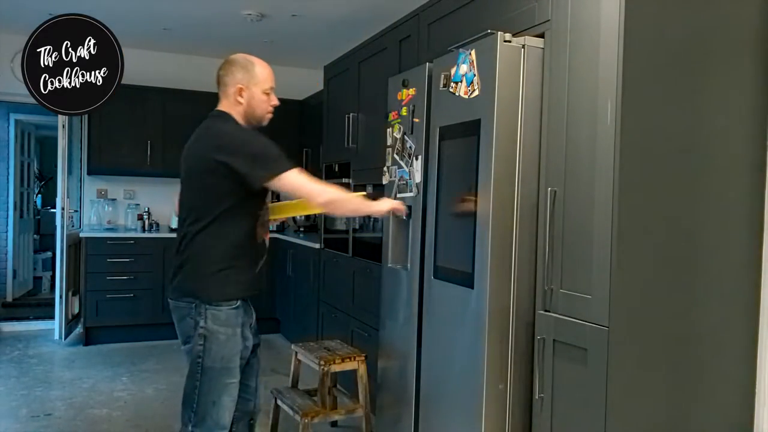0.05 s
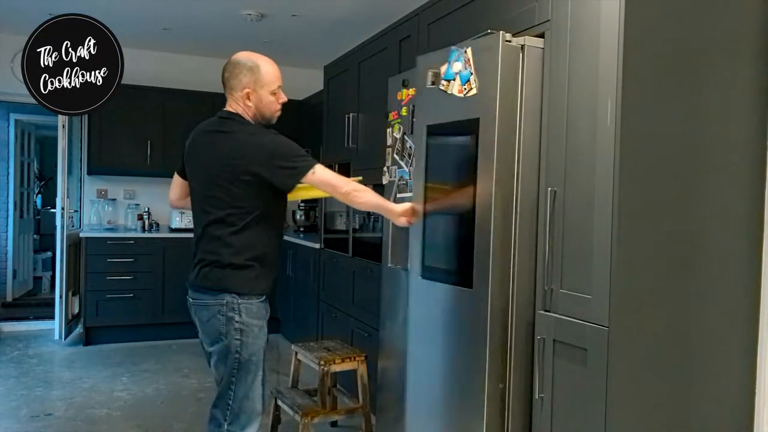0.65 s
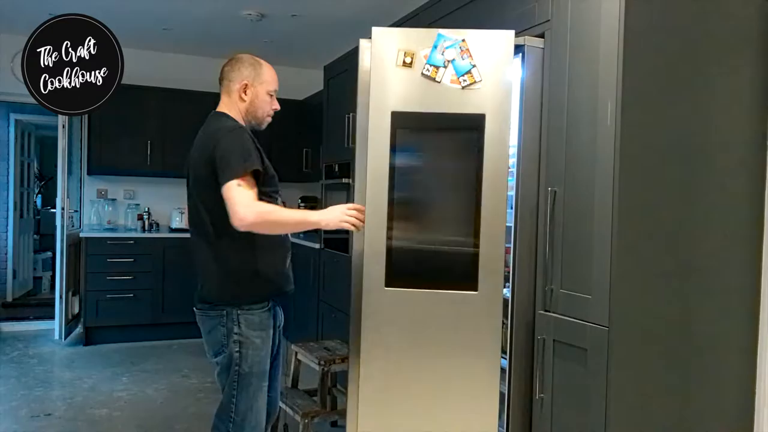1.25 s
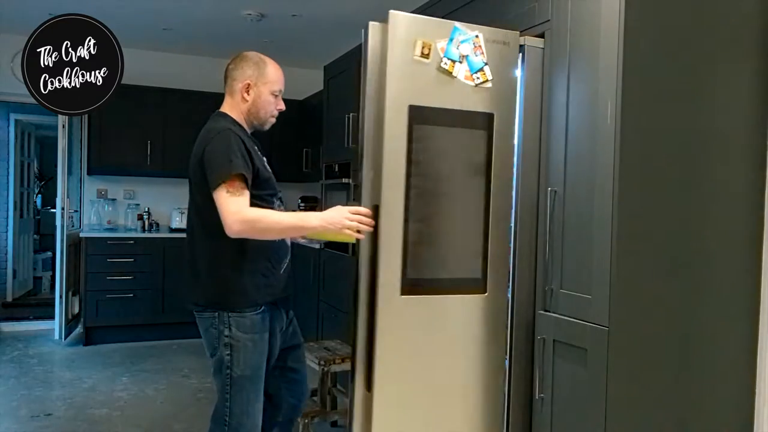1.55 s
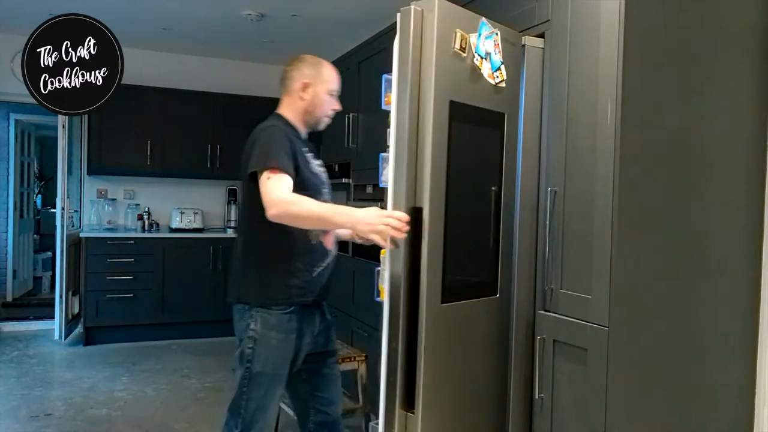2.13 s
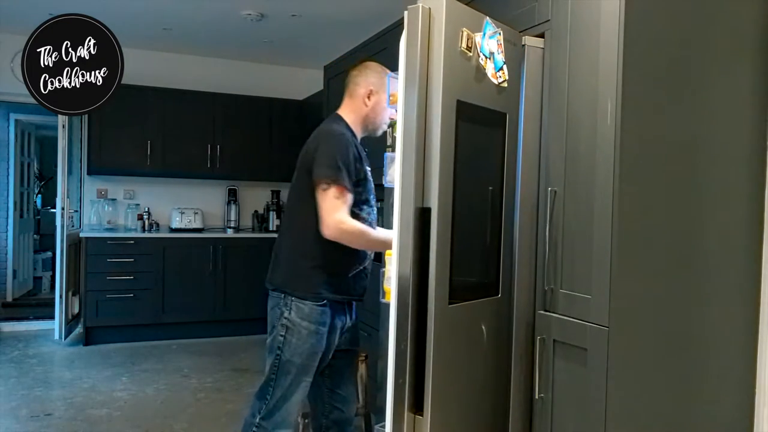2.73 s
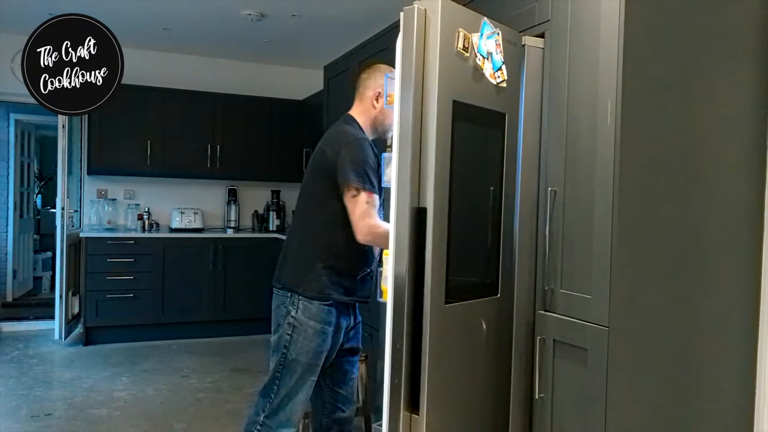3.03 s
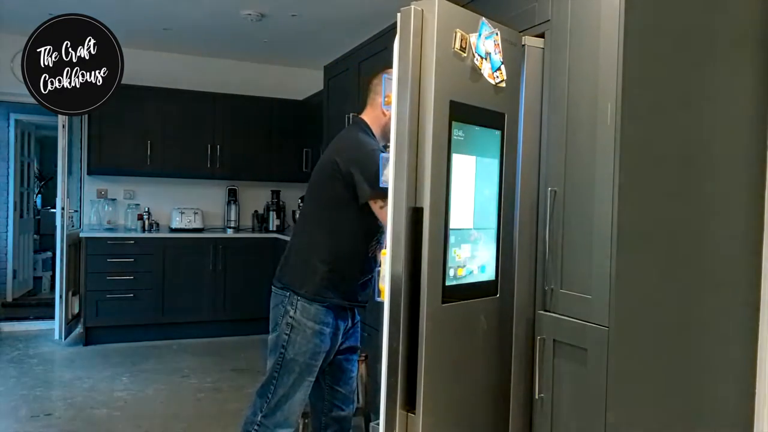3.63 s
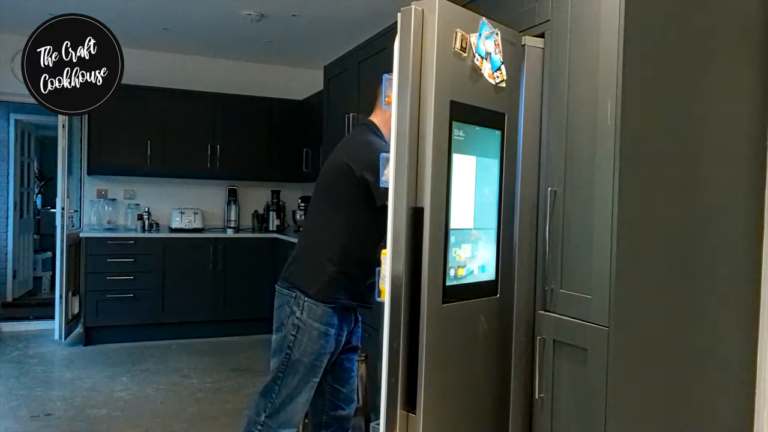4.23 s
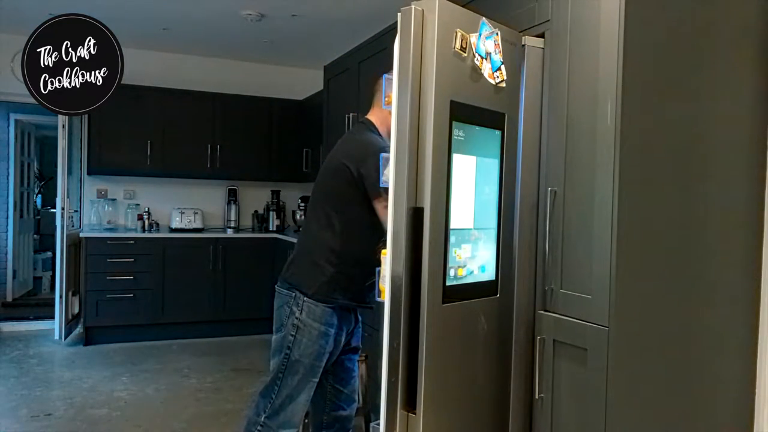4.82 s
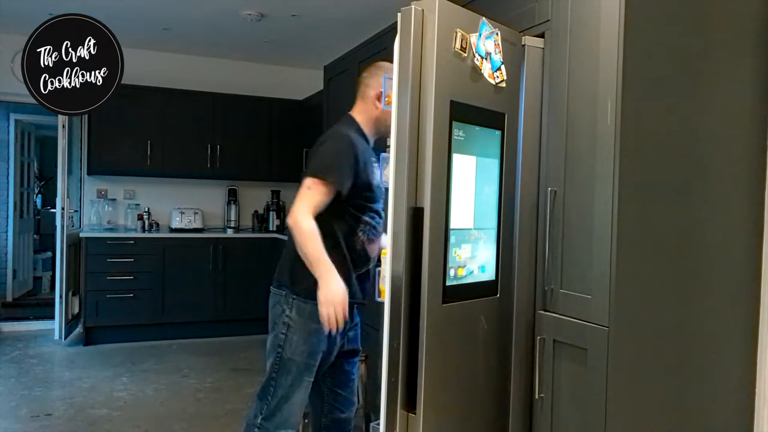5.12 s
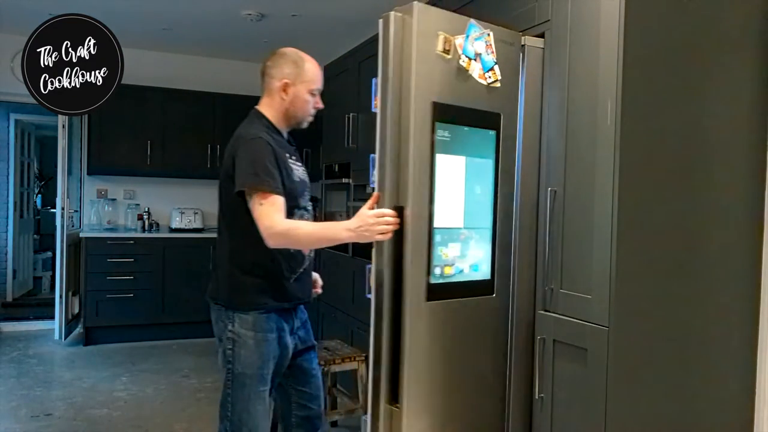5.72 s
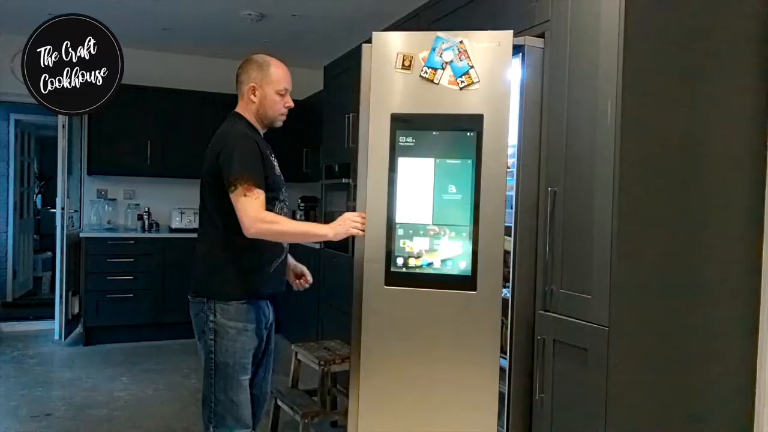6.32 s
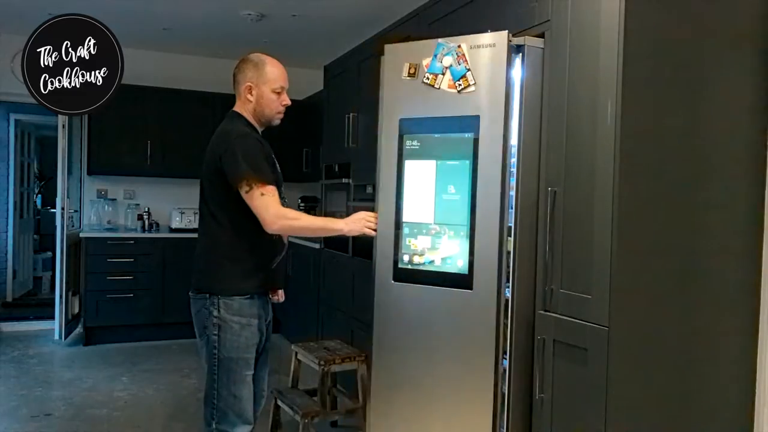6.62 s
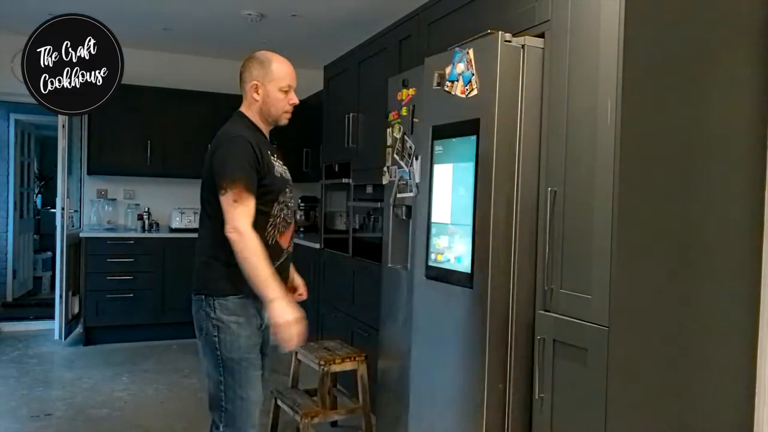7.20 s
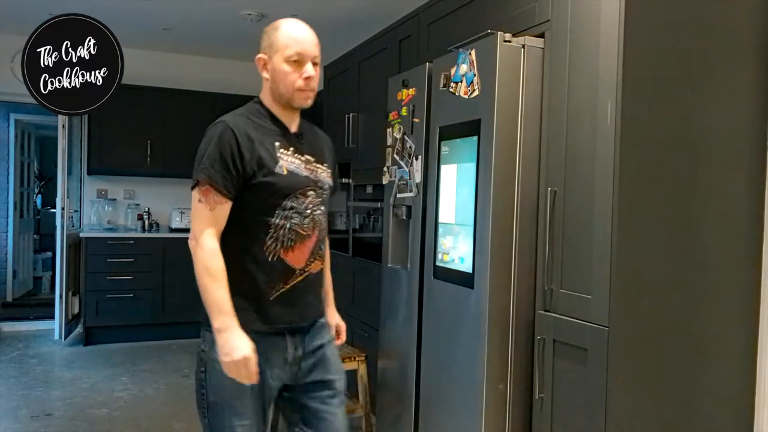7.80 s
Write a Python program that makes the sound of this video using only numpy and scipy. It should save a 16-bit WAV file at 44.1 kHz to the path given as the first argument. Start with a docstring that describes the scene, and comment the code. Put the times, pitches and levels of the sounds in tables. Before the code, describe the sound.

In a kitchen, someone opens a fridge, slides a dish in among clattering jars and tubs, and swings the door heavily shut.

```python
"""Fridge door and dishes

In a hard-floored kitchen, a rubber seal peels open and the hinge knocks and swishes as the door swings.
Jars, tubs and a dish are bumped, slid and set down; each knock sounds its own note and rings the shelves.
The door swings back with a faint squeak, pushes out a puff of air and shuts with a clack, a rattle
and a deep boom of the cabinet. Room air and the compressor's low hum run underneath."""
import sys
import numpy as np
from scipy import signal
from scipy.fft import rfft, irfft, next_fast_len
from scipy.io import wavfile
from scipy.ndimage import uniform_filter1d, map_coordinates

SR = 44100
rng = np.random.default_rng(int(sys.argv[2]) if len(sys.argv) > 2 else 0)


def waveform_to_disk(signal):
    """Save audio, clipped to [-1, 1], as 16-bit WAV at the path in sys.argv[1]."""
    frames = np.transpose(np.atleast_2d(signal))
    scaled = np.clip(frames, -1, 1) * 32767
    samples = np.round(scaled).astype(np.int16)
    wavfile.write(sys.argv[1], SR, samples)


N = 346302

# Levels in the tables are relative: the layers add their own trims.
BAND_EDGES = [45, 160, 450, 950, 1900, 4200, 16000]  # bounds of thump, knock, body, clack, snap and tick (frequency [Hz])
BAND_HZ = np.sqrt(np.multiply(BAND_EDGES[:-1], BAND_EDGES[1:]))
# tone of each kind of contact, a value per band (level [dB])
DOOR_BANDS = [-11.5, -4, -1, -6, -15, -19.5]
SHELF_BANDS = [-10.5, -2, -1, -4, -13, -11.5]
TICK_BANDS = [-18, -15.5, -16, -10, -13, -1]
SLAM_BANDS = [-2.5, -7.5, -3.5, -5, -19.5, -12.5]

# seal, hinge and handle (time [s], level [dB], hardness [dB/octave], room send [dB], pitch [Hz])
DOOR_KNOCKS = [(.31, -62, 5, 8, 1850), (.442, -44, -3, 8.5, 1400), (.51, -34.5, -3.5, 4, 1094),
               (.54, -44.5, 0.5, 10, 1440), (0.858, -50.5, -2, 9, 335), (1.072, -58.5, -6, -1, 296),
               (1.446, -67, 0, 13, 510), (1.754, -62.5, 7.5, 8.5, 640), (1.983, -59.5, -1.5, 8.5, 1510),
               (5.386, -49, 5, 0.5, 226), (5.495, -53.5, 3.5, 9.5, 1145), (5.961, -53, 0.5, 7.5, 338),
               (6.309, -54.5, 4.5, -0.5, 715), (6.61, -56.5, -11, 6, 320), (6.789, -63, -0.5, 10.5, 700)]
# the cabinet and its trapped air bounce (time [s], level [dB], pitch [Hz], t60 [s], rise [s])
BOOMS = [(0.534, -34.5, 59, 0.39, 0.0056), (5.374, -41, 61, 0.3, .005), (7.161, -43, 48.8, 0.33, 0.0079),
         (7.331, -15, 48.1, 0.3, 0.00018), (7.337, -30, 58, 0.54, 0.026)]
# jars, tubs and the dish hit the shelf (time [s], level [dB], hardness [dB/octave], room send [dB],
# pitch [Hz], note over knock [dB], note t60 [s])
SHELF_KNOCKS = [(2.132, -27, -2.5, -1, 232, 1, .33), (2.546, -29.5, 2, -4.5, 1200, 12.5, 0.03),
                (2.64, -32.5, -0.5, -1.5, 675, 1, 0.5), (2.733, -37, -3, 0.5, 71, -1, 0.64),
                (3.027, -47.5, 0, 2, 118, 13.5, 0.2), (3.157, -32, 3, -1.5, 734, -7, 0.68),
                (3.403, -34.5, 3, -7, 508, 21.5, 0.034), (3.646, -56, 2.5, -1.5, 783, 2, 0.3),
                (3.772, -39.5, 3.5, -0.5, 150, 0, 0.13), (3.792, -39, -14, 2.5, 240, 3, 0.11),
                (3.837, -32.5, -0.5, -9.5, 332, 6, 0.39), (3.902, -40, 1, 5.5, 100, -3.5, 0.17),
                (3.957, -43.5, 1, -6, 2040, 9, .045), (3.996, -26.5, 4.5, -7, 1360, 0.5, .06)]
TICKS = [(4.195, -44), (4.283, -47), (4.459, -47), (4.792, -54.5)]  # light plastic ticks (time [s], level [dB])
SQUEAK = [(6.04, 11600, -85), (6.15, 10800, -76), (6.26, 10400, -81), (6.37, 9400, -82)]  # the hinge sings, falling as the door slows (time [s], pitch [Hz], level [dB])

# envelopes (time [s], level [dB])
SEAL_PEEL = [(.33, -82), (.39, -63.5), (.44, -61), (.51, -57), (.6, -64), (.7, -70), (.85, -79)]
HINGE_SWINGS = [
    [(1.3, -95), (1.394, -71), (1.644, -65), (2.1, -72)],
    [(5.92, -92), (5.986, -67), (6.23, -81), (6.29, -88)],
    [(6.93, -97), (6.974, -85), (7.146, -74.5), (7.3, -75)],
]  # one per swing
SHELF_SLIDES = [
    [(2.755, -69), (2.789, -50), (2.815, -56.5), (2.865, -56), (2.95, -76)],
    [(3.45, -60.5), (3.58, -55.5), (3.59, -52.5), (3.648, -61), (3.74, -70)],
    [(3.925, -53), (3.963, -36), (3.99, -40)],
    [(4.025, -45), (4.041, -50.5), (4.125, -43), (4.173, -59), (4.18, -53)],
    [(4.22, -63), (4.234, -52.5), (4.41, -64), (4.464, -51.5), (4.58, -67)],
]  # one per slide
AIR_PUFF = [(7.1, -70), (7.17, -50.5), (7.22, -55.5), (7.29, -49), (7.325, -47), (7.335, -61)]

# noise colours (frequency [Hz], spectral level [dB])
ROOM_AIR = [(20, -0.5), (50, -3), (75, -4.5), (110, -9), (160, -9.5), (300, -13), (500, -18.5), (1000, -25),
            (2400, -32), (4500, -40.5), (8000, -40), (12500, -38.5), (16000, -33)]
RUBBER = [(100, 0), (300, 6), (800, 13.5), (1800, 5.5), (3500, -3), (7000, -5.5), (11000, -3.5),
          (16000, -7)]  # peeling seal
SWISH = [(2500, -30), (4500, -20), (6800, -9.5), (9800, -2), (11300, -5), (12300, -15), (16000, -11)]  # rubbing hinge
GLIDE = [(1000, -20), (3000, -15), (5000, -10), (8000, 1.5), (11000, 6), (13500, 4), (16000, -24)]  # light slide
SCRAPE = [(300, 6), (1000, 1.5), (2000, -7), (3000, -13.5), (5000, -8.5), (8000, -3.5), (12000, -4),
          (16000, -10)]  # hard slide
HOLLOW = [(40, -15), (75, 10), (140, -3), (235, -4), (335, 6.5), (450, -20), (650, 6.5), (1000, -12),
          (3000, -54)]  # cabinet under a slide
DRAUGHT = [(25, 4), (60, -8.5), (150, -5.5), (600, -9), (1500, -26), (4000, -45), (16000, -75)]  # air through the closing gap
RATTLE = [(1200, -22), (1900, -15.5), (2450, 9), (2900, 3), (3600, -21), (6000, -30), (16000, -40)]  # door racks

FRIDGE_MODES = [(108, -2, 0.6), (187.5, -20, 0.33), (235, 1.5, 0.49), (320, 4, 0.36), (431, 0, 0.15),
                (613, -1, 0.56), (674, -5.5, 0.65), (753, -0.5, 0.22), (1146, -7.5, 0.23),
                (1385, -5.5, 0.4), (1547, -11.5, 0.81), (1680, -4.5, 0.4), (1880, -9, 0.12),
                (2520, -13, 0.23), (3350, -7.5, 0.43), (5700, -11, 0.12), (6300, -33, 0.14)]  # cabinet with loaded shelves (frequency [Hz], level [dB], t60 [s])
KITCHEN_DECAY = [(60, 0.6), (250, 0.65), (700, 0.86), (2500, 0.81), (5500, 0.65), (11000, 0.44)]  # reverb time (frequency [Hz], t60 [s])
WALLS = [(50, -3.5), (200, -6), (600, -9), (1500, -11), (2600, -6.5), (5000, -13), (12000, -8.5)]  # colour of the reflections (frequency [Hz], level [dB])
MICROPHONE = [(11000, -1.5), (13500, -4), (15800, -10)]  # treble roll-off (frequency [Hz], gain [dB])


def amp(db):
    """Decibels to gain."""
    return np.exp(np.asarray(db) * (np.log(10) / 20))


def unit(x):
    """x at rms 1."""
    return x / np.sqrt(np.mean(x ** 2) + 1e-20)


def along(points, hz):
    """Read a curve of (frequency [Hz], value) on a log axis."""
    f, v = np.transpose(points)
    return np.interp(np.log(hz + 1), np.log(f + 1), v)


def envelope(rows):
    """Gain per sample from (time [s], level [dB]), silent outside the rows."""
    s, db = np.transpose(rows)
    return amp(np.interp(np.arange(N) / SR, s, db, left=-120, right=-120))


def wobble(rate):
    """A smooth random curve, rate knots a second."""
    return map_coordinates(rng.standard_normal(int(N * rate / SR) + 4), [np.arange(N) * rate / SR])


def filtered(x, response):
    """EQ x with a gain given as a function of frequency."""
    size = next_fast_len(N + SR // 2)
    return irfft(rfft(x, size) * response(np.fft.rfftfreq(size, 1 / SR)), size)[:N]


def coloured(x, spectrum):
    """x shaped by a noise colour, at rms 1."""
    return unit(filtered(x, lambda hz: amp(along(spectrum, hz))))


def add(track, s, sound):
    """Mix a sound into the track at time s."""
    start = round(s * SR)
    track[start:start + len(sound)] += sound[:N - start]


def background():
    """The bed: room air, the compressor's low hum, and a thin whine while the door stands open."""
    hum_hz, whine_hz = 58, 6550
    swell_db, phase_drift = .6 * wobble(4), .8 * wobble(5)
    air = amp(-59 + swell_db) * coloured(rng.standard_normal(N), ROOM_AIR)
    hum = amp(-64) * np.sin(2 * np.pi * hum_hz * np.arange(N) / SR + phase_drift)
    whine = unit(filtered(rng.standard_normal(N), lambda hz: 1 / (1 + ((hz - whine_hz) / 70) ** 2)))
    return air + hum + envelope([(2, -79), (2.4, -84), (5.3, -82.5), (5.7, -86)]) * whine


def contact_bands(colour, db, hardness, hz):
    """Band levels of a contact: brighter the harder it is, with a bump around its own pitch."""
    treble_from_hz, bump_octaves = 1150, .7
    treble_db = hardness * np.maximum(0, np.log2(BAND_HZ / treble_from_hz))
    bump_db = 8 * np.exp(-(np.log2(BAND_HZ / hz) / bump_octaves) ** 2 / 2)
    return db + np.array(colour) + treble_db + bump_db


def impact(bands, t60_at_1k, damping, crack, rise_s, jolt):
    """One hit: a jolt, a short crack and a noisy crowd of panel modes, the high ones dying first."""
    t = np.arange(SR // 4) / SR
    pulse = signal.unit_impulse(len(t), round(.002 * SR))
    out = np.zeros(len(t))
    for lo, hi, db in zip(BAND_EDGES, BAND_EDGES[1:], bands):
        t60 = t60_at_1k * (np.sqrt(lo * hi) / 1000) ** -damping
        shape = (amp(-60 * t / t60) + crack * amp(-60 * t / .01)) * (1 - np.exp(-t / rise_s))
        panels = shape * rng.standard_normal(len(t)) / np.linalg.norm(shape)
        softness = 1 / (1 + lo / 2000)
        bandpass = signal.butter(3, [lo, hi], "bandpass", fs=SR, output="sos")
        band = signal.sosfilt(bandpass, panels + jolt * softness * pulse)
        # the band's level is its energy spread over 10 ms
        out += amp(db) * band / np.sqrt(np.sum(band ** 2) / (SR / 100))
    return out


def struck_note(db, hz, t60):
    """A struck thing rings at its own pitch, with a brief overtone."""
    overtone_ratio, overtone_t60 = 1.42, .04
    t = np.arange(SR // 2) / SR
    fundamental = amp(-60 * t / t60) * np.sin(2 * np.pi * hz * t)
    overtone = amp(-4.5 - 60 * t / overtone_t60) * np.sin(2 * np.pi * overtone_ratio * hz * t)
    return amp(db) * (fundamental + overtone) * (1 - np.exp(-t / .00088))


def fridge_ring(bands, scatter_db=2):
    """Each fridge mode rings as hard as the hit drives it; the loose load blurs its pitch."""
    t = np.arange(27000) / SR
    drive = list(zip(BAND_HZ, bands))
    out = np.zeros(len(t))
    for hz, db, t60 in FRIDGE_MODES:
        start_db = db + along(drive, hz) + scatter_db * rng.standard_normal()
        jitter_hz = np.repeat(rng.standard_normal(len(t) // 100), 100) * np.sqrt(hz) / 3.5
        cycles = (hz * t + np.cumsum(jitter_hz) / SR + rng.random()).astype(np.float32)
        out += amp(start_db - 60 * t / t60) * np.sin(2 * np.pi * cycles)
    return out * (1 - np.exp(-t / .0014))


def kitchen_reverb(bands, build_s=.0051):
    """The kitchen's diffuse tail after a hit: each frequency dies at its own speed."""
    density_db = bands + 10 * np.log10(SR / 2 / np.diff(BAND_EDGES))
    hz, t, noise = signal.stft(rng.standard_normal(SR), SR, nperseg=1024)
    start_db = along(list(zip(BAND_HZ, density_db)), hz) + along(WALLS, hz)
    decay_db = 60 * t / along(KITCHEN_DECAY, hz)[:, None]
    tail = signal.istft(noise * amp(start_db[:, None] - decay_db), SR, nperseg=1024)[1]
    return tail * (1 - np.exp(-np.arange(len(tail)) / SR / build_s))


def friction(spectrum):
    """Dense tiny slips of uneven size, catching and letting go, at rms 1."""
    slips = amp(2.5 * wobble(900) + 2.2 * wobble(110))
    return coloured(rng.standard_normal(N) * slips, spectrum)


def door():
    """The seal peels away; hinge and handle knock as the door swings out and back."""
    out = amp(6) * envelope(SEAL_PEEL) * friction(RUBBER)
    for s, db, hardness, room_db, hz in DOOR_KNOCKS:
        bands = contact_bands(DOOR_BANDS, db, hardness, hz)
        knock = impact(bands, t60_at_1k=.12, damping=.095, crack=2.5, rise_s=.00039, jolt=.25)
        add(out, s, amp(-2) * knock)
        add(out, s, struck_note(db, hz, t60=.065))
        add(out, s, amp(-7.5) * fridge_ring(bands))
        add(out, s, amp(room_db - 2.5) * kitchen_reverb(bands))
    return out


def cabinet_booms():
    """A sudden push sets the whole box bouncing at a very low pitch."""
    out, t = np.zeros(N), np.arange(SR) / SR
    for s, db, hz, t60, rise_s in BOOMS:
        shape = amp(db - 60 * t / t60) * (1 - np.exp(-t / rise_s))
        add(out, s, -shape * np.cos(2 * np.pi * hz * t))
    return out


def hinge():
    """The hinge rubs: a thin swish as the door moves, and a faint rough squeak on its way back."""
    swinging = sum(envelope(swing) for swing in HINGE_SWINGS)
    swish = amp(1.5) * swinging * coloured(rng.standard_normal(N), SWISH)
    s, hz, db = np.transpose(SQUEAK)
    cycles = np.cumsum(np.interp(np.arange(N) / SR, s, hz)) / SR
    squeak = unit(wobble(rate=500) * np.sin(2 * np.pi * cycles))
    return swish + envelope(list(zip(s, db))) * squeak


def shelf_knocks():
    """Jars, tubs and the dish hit the shelf: each sounds its note and the fridge rings on a little."""
    soft_onset_s, note_lag_s = .0045, .002
    out = np.zeros(N)
    for s, db, hardness, room_db, hz, note_db, t60 in SHELF_KNOCKS:
        bands = contact_bands(SHELF_BANDS, db, hardness, hz)
        knock = impact(bands, t60_at_1k=.078, damping=.064, crack=4.7, rise_s=.0033, jolt=.24)
        add(out, s - soft_onset_s, amp(-21.5) * knock)  # a faint copy just ahead softens the attack
        add(out, s, knock)
        add(out, s + note_lag_s, struck_note(db + note_db, hz, t60))
        add(out, s, amp(-10) * fridge_ring(bands))
        add(out, s, amp(room_db) * kitchen_reverb(bands))
    return out


def shelf_slides():
    """A light push hisses and crackles; a hard one scrapes lower and sets the hollow cabinet rumbling."""
    ease_s, catches_per_s, burst_s = .012, 70, .002
    slides = sum(envelope(slide) for slide in SHELF_SLIDES)
    push = np.abs(uniform_filter1d(slides, round(ease_s * SR)))
    pressure = push / push.max()
    light, hard = np.sqrt(1 - pressure), np.sqrt(pressure)  # equal-power crossfade
    catches = (rng.random(N) < catches_per_s / SR) * rng.uniform(.4, 1, N)
    bursts = signal.lfilter([1], [1, -np.exp(-1 / (burst_s * SR))], catches)
    crackle = amp(-3) * light * coloured(bursts * rng.standard_normal(N), SCRAPE)
    hiss = amp(-2) * light * friction(GLIDE)
    scrape = amp(5.5) * hard * friction(SCRAPE)
    rumble = amp(.5) * hard * friction(HOLLOW)
    return push * (crackle + hiss + scrape + rumble)


def plastic_ticks():
    """Small bright contacts as the hands let go, too light to ring the cabinet."""
    out = np.zeros(N)
    for s, db in TICKS:
        bands = db + np.array(TICK_BANDS)
        add(out, s, impact(bands, t60_at_1k=.064, damping=.095, crack=2.6, rise_s=.0012, jolt=.18))
        add(out, s, amp(-3.5) * kitchen_reverb(bands))
    return out


def door_slam():
    """Air rushes out of the closing gap; the door clacks on its frame, panels shake and racks rattle."""
    shut_s, clack_hz = 7.332, 1300
    t = np.arange(SR) / SR
    bands = np.array(SLAM_BANDS) - 26
    out = envelope(AIR_PUFF) * coloured(rng.standard_normal(N), DRAUGHT)
    add(out, shut_s, impact(bands, t60_at_1k=.11, damping=.17, crack=3.9, rise_s=.00045, jolt=.49))
    clack = -amp(-16 - 60 * t / .011) * np.sin(2 * np.pi * clack_hz * t)
    add(out, shut_s, clack)
    add(out, shut_s, amp(-11.5) * fridge_ring(bands))
    add(out, shut_s, amp(3) * kitchen_reverb(bands))
    rattle_shape = amp(-50 - 60 * t / .88) * (1 - np.exp(-t / .0056))
    add(out, shut_s, rattle_shape * friction(RATTLE)[:len(t)])
    return out


def scene():
    """All layers mixed to mono."""
    mix = background() + door() + cabinet_booms() + hinge()
    mix += shelf_knocks() + shelf_slides() + plastic_ticks() + door_slam()
    return mix[None]


def record(dry):
    """The microphone softens the top octave; the converter has a band limit and a small steady offset."""
    top_hz, dc_offset = 15830, .0036
    return filtered(dry[0], lambda hz: amp(along(MICROPHONE, hz)) * (hz < top_hz))[None] + dc_offset


dry = scene()
out = record(dry)
waveform_to_disk(out)
```